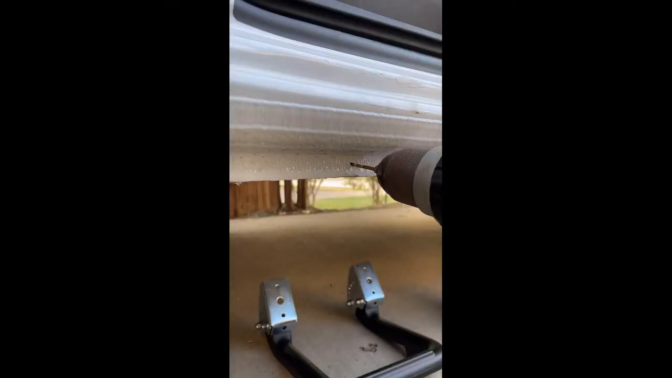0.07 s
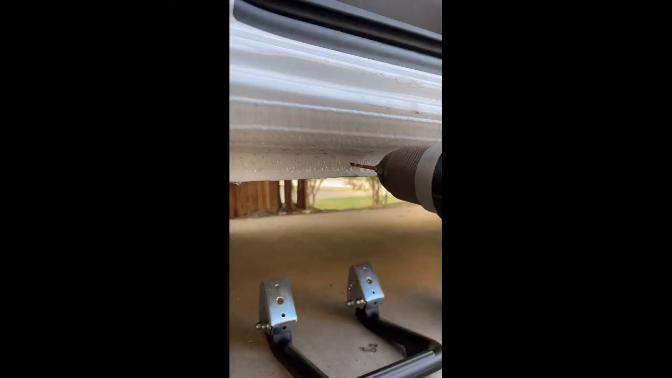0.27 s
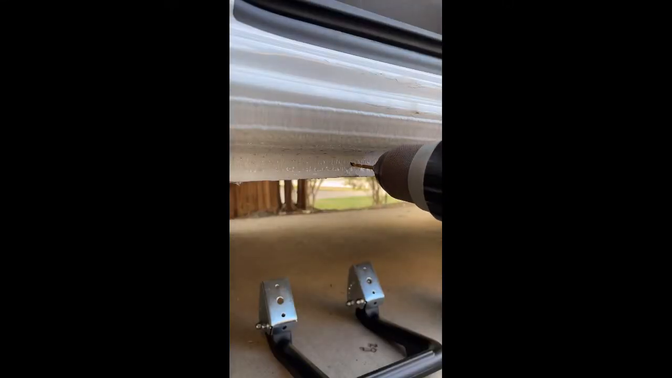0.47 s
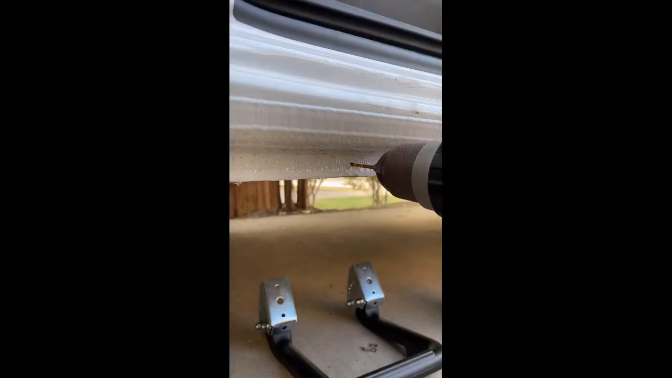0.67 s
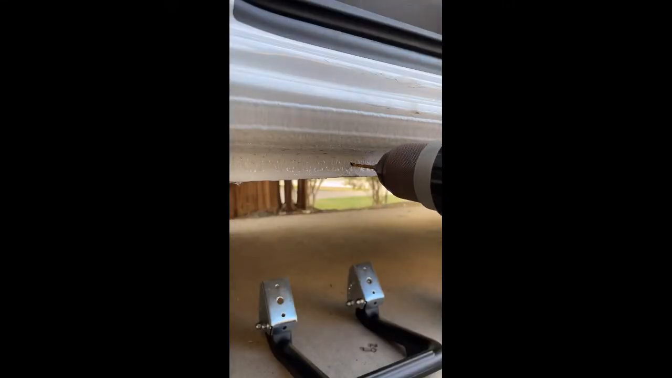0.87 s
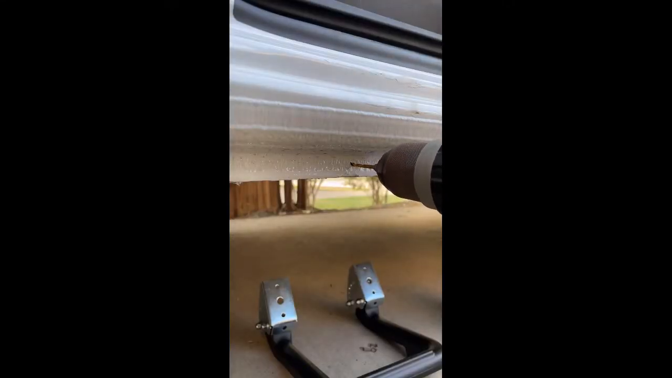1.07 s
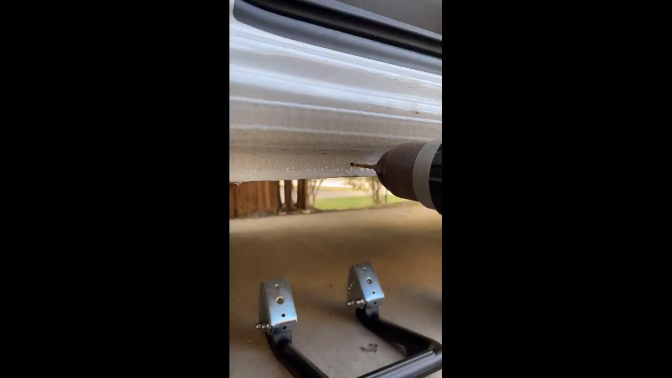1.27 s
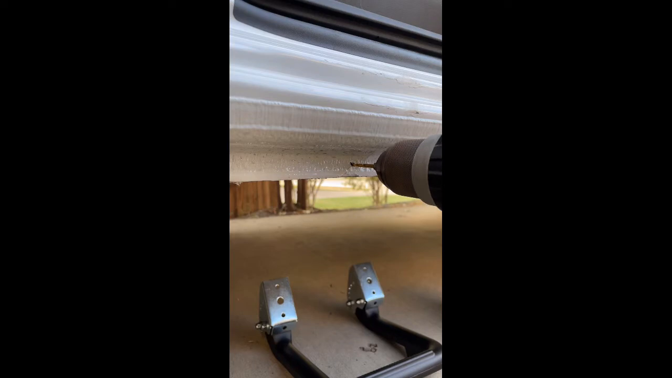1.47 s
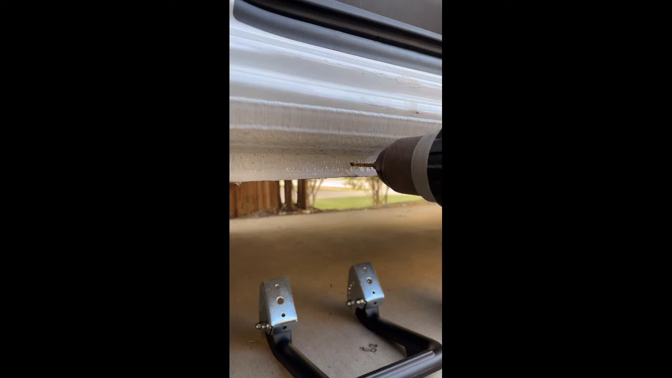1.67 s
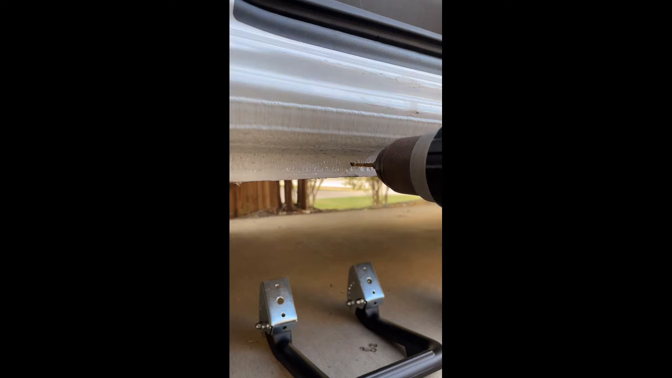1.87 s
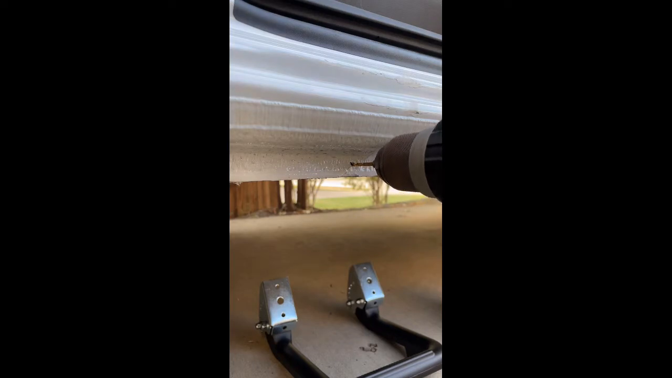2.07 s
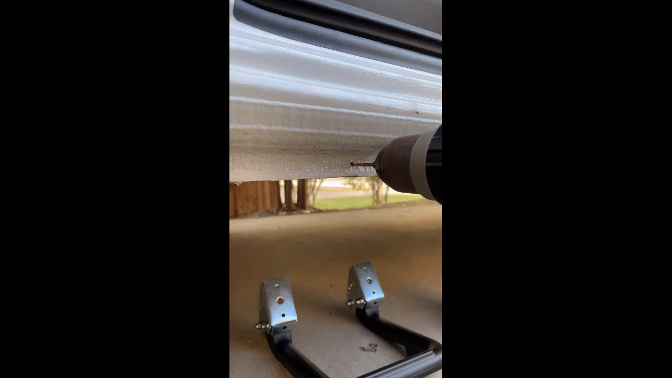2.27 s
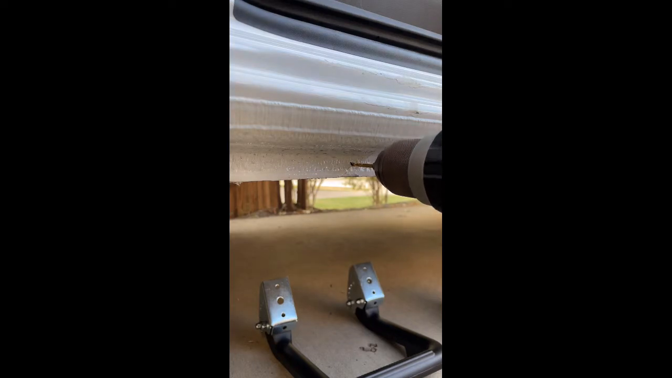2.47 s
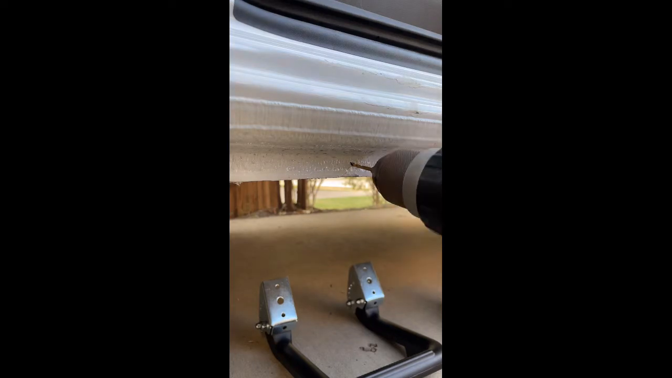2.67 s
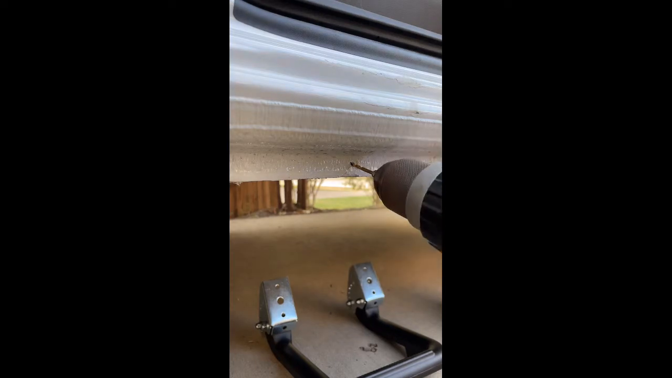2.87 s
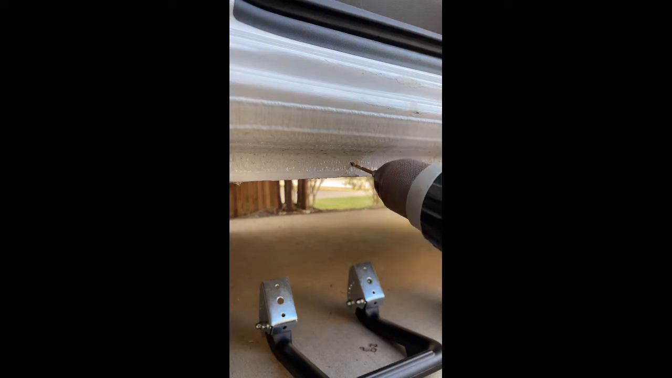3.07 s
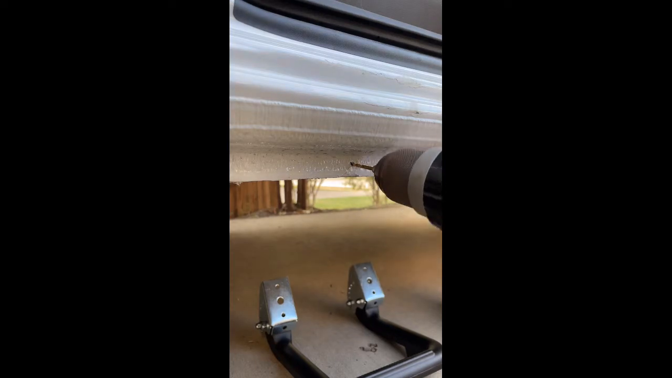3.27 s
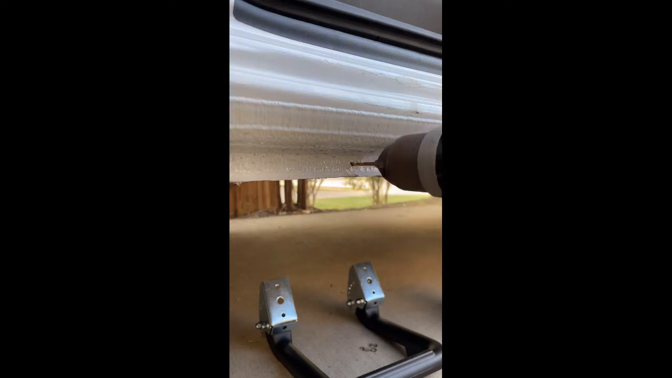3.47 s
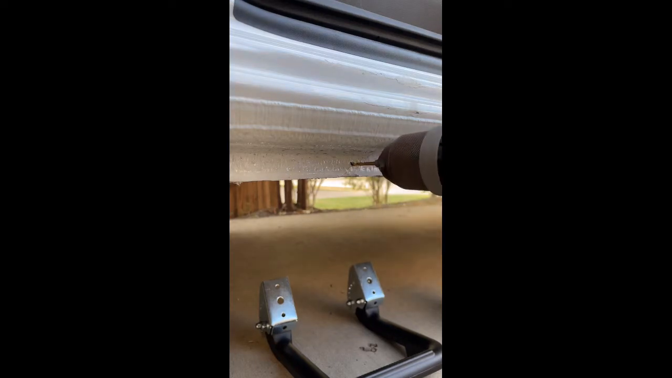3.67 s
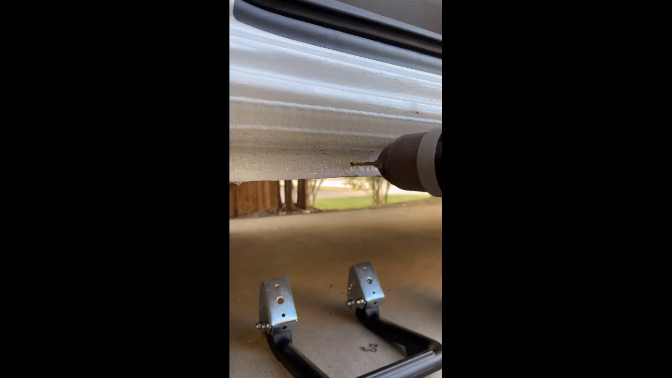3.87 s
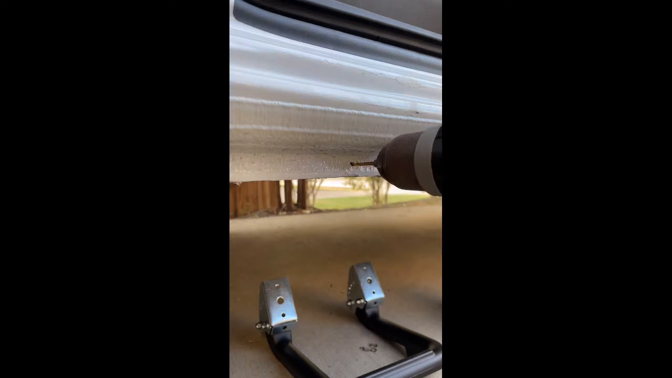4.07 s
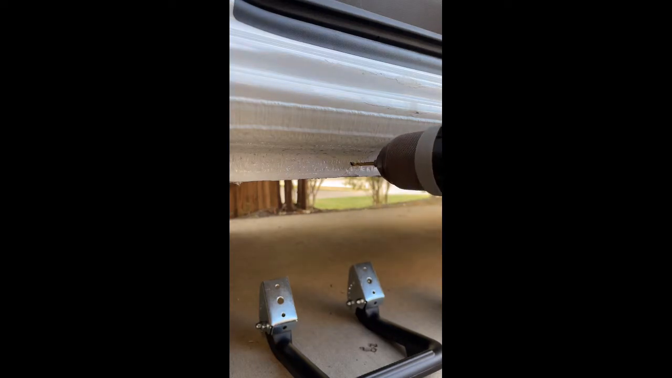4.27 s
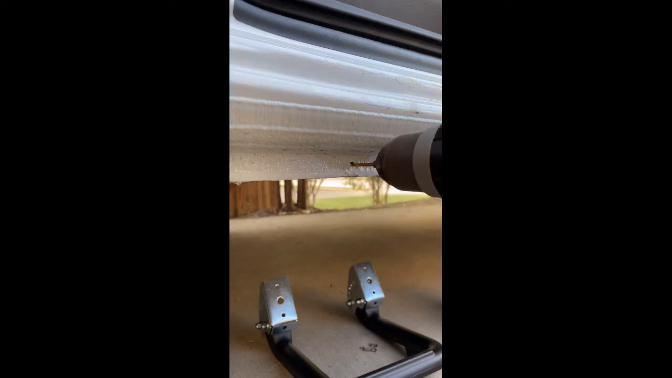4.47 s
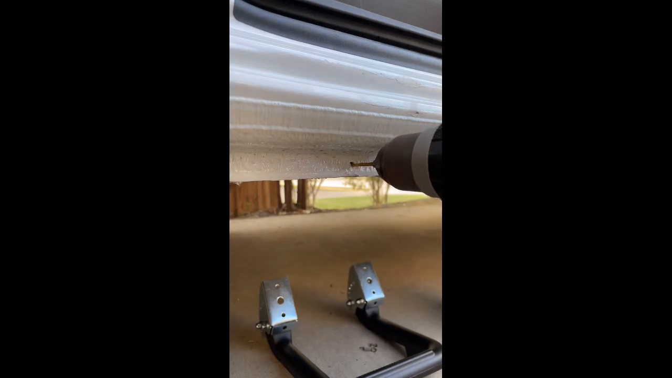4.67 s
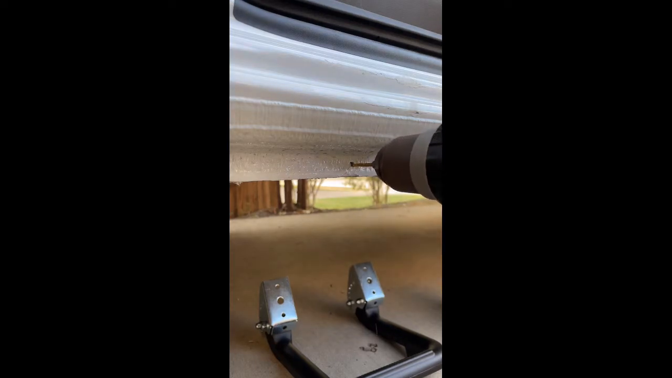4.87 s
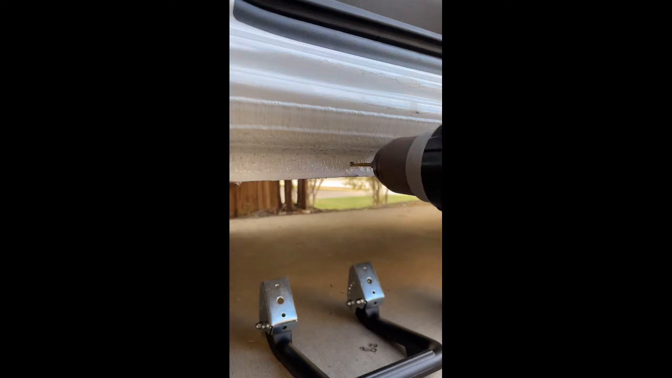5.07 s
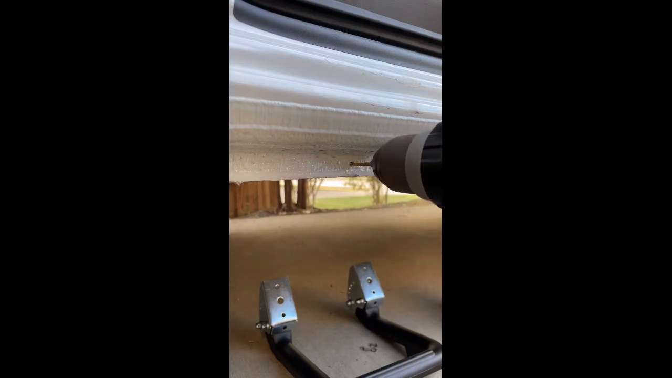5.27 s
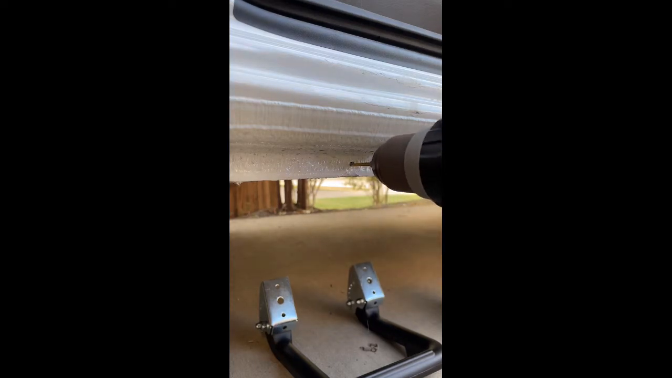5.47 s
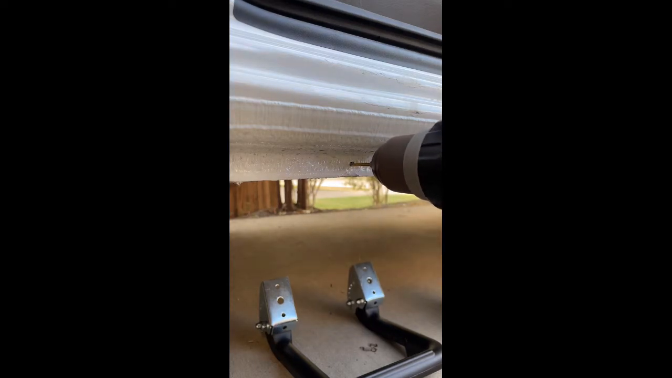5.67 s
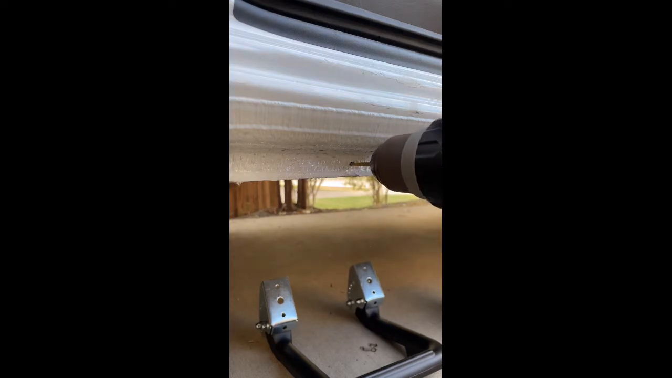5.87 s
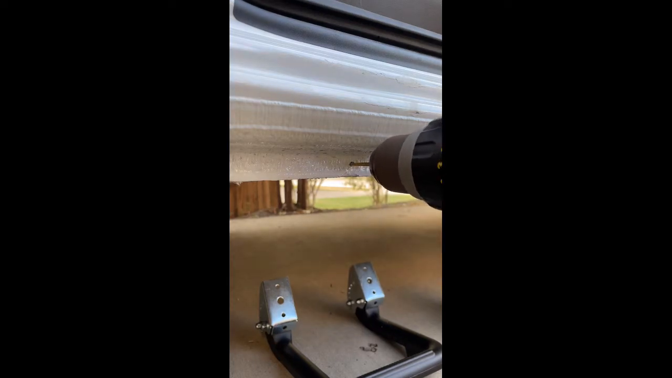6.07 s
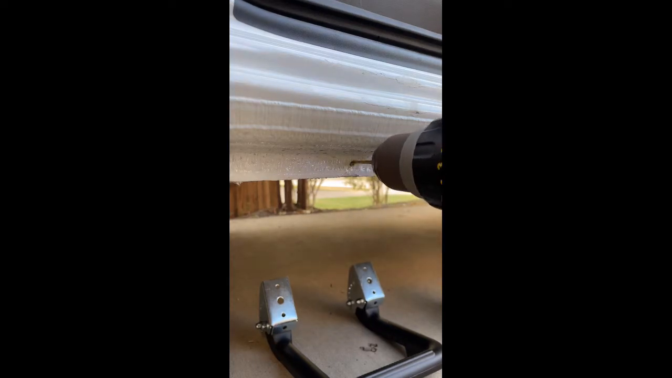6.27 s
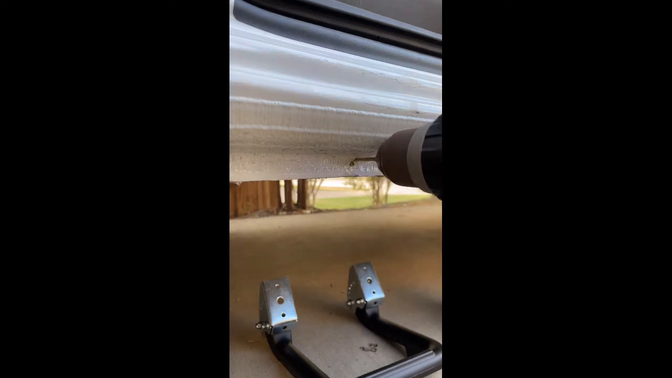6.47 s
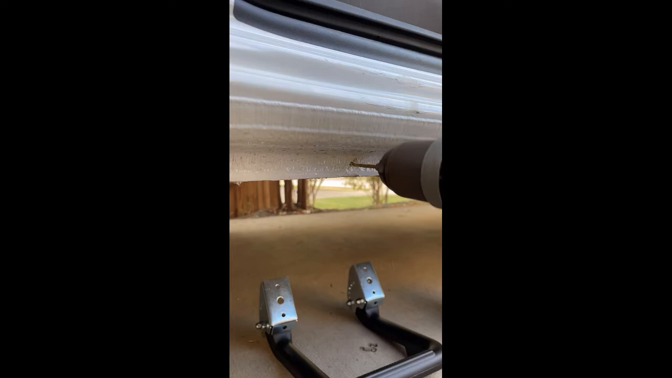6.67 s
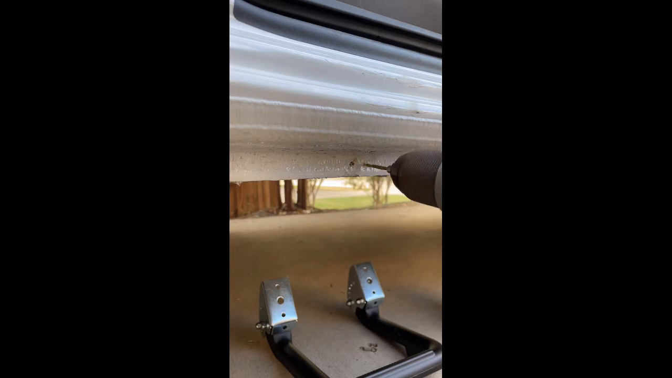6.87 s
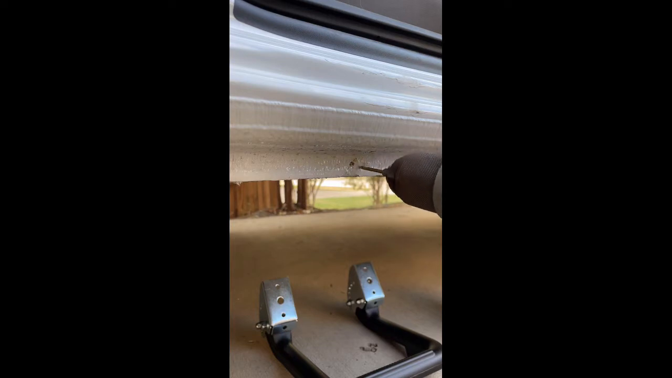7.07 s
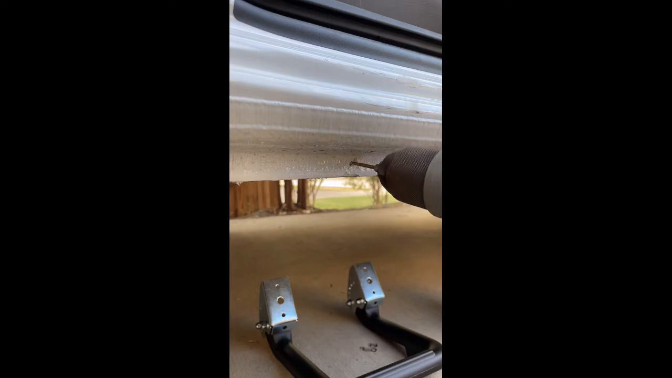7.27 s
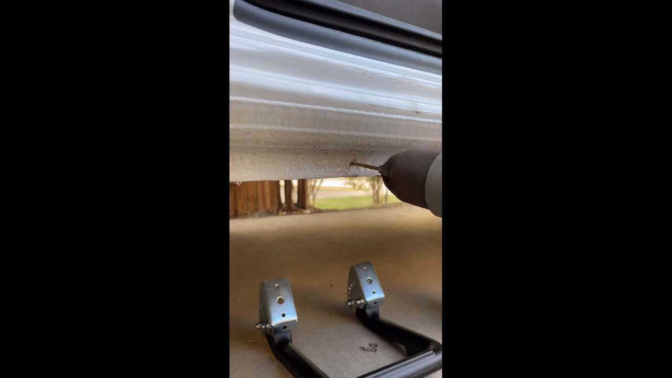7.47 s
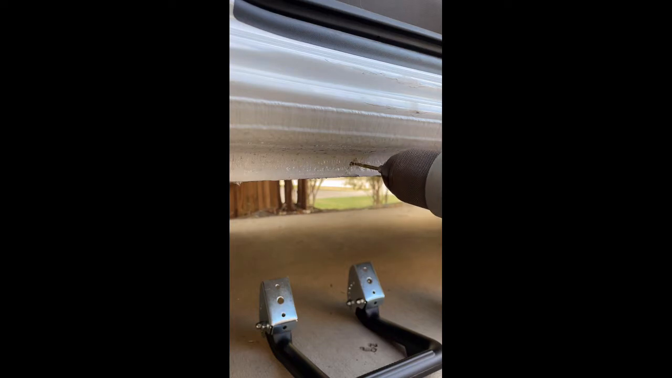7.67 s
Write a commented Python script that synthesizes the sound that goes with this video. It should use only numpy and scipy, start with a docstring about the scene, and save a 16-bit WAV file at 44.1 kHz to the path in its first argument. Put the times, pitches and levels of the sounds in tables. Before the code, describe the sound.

A cordless drill whines and grinds through sheet metal in one short run, with light taps and a low outdoor rumble.

```python
"""Drilling into a van

A cordless drill bores a small hole in a van's sheet metal, close by, over a low outdoor rumble.
After a few light taps and bumps, the speed controller whistles, the spindle lock clacks free and
the motor winds up into a whine over grinding gears and the scraping bit. The brake stops it with
a second clack, and the bit rattles faintly out of the hole, making the thin metal ring."""
import sys
import numpy as np
from scipy import signal
from scipy.fft import rfft, irfft
from scipy.io import wavfile
from scipy.ndimage import uniform_filter1d, map_coordinates

SR = 44100
rng = np.random.default_rng(int(sys.argv[2]) if len(sys.argv) > 2 else 0)


def log_audio(samples):
    """Write samples as a 16-bit WAV file to the path given in sys.argv[1]."""
    # one column per channel
    frames = np.atleast_2d(samples).T
    # limit to full scale, then quantise
    limited = np.clip(frames, -1, 1)
    pcm = np.round(limited * 32767).astype(np.int16)
    wavfile.write(sys.argv[1], SR, pcm)


N = 340893
TIME = np.arange(N) / SR
FREQS = np.arange(N // 2 + 1) * SR / N
FULL_SPEED_HZ = 361.6  # motor turns a second
TRIGGER_S, BRAKE_S = 4.2585, 6.691

# Outdoor rumble, its swells and the air: (frequency [Hz], level [dB])
RUMBLE_SPECTRUM = [(15, -48), (25, -27.5), (38, -16.5), (58, 1.5), (80, -0.5), (115, -1.5), (160, -10),
                   (210, -17), (240, -10.5), (280, -17), (380, -24), (600, -42), (1200, -73)]
SWELL_SPECTRUM = [(40, -16), (105, 3.5), (160, -7.5), (235, -4.5), (300, -20), (550, -20), (900, -48),
                  (2500, -80)]
AIR_SPECTRUM = [(200, -3), (450, 2), (800, 0.5), (1350, 2), (1800, -4.5), (2300, -10.5), (3200, -12.5),
                (5000, -17.5), (10000, -22), (11500, -28), (13000, -30), (15000, -24)]
# When the rumble swells: (time [s], half length [s], level [dB])
SWELL_TIMES = [(1.78, 0.29, -46), (3.002, 0.43, -40.5)]
# A distant machine: (frequency [Hz], level [dB])
HUM_TONES = [(511.4, -63), (1222, -67.5), (1405, -69), (1674, -70), (2552, -80), (5281, -86.5), (9943, -91),
             (10078, -95), (10207, -83.5), (13851, -95.5), (14099, -98), (14346, -96.5)]
# The bit taps the panel: (time [s], level [dB], centre pitch [Hz])
BIT_TAPS = [(0.091, -47, 7500), (1.0298, -38.5, 2790), (2.667, -48, 9000), (3.0374, -52, 8000),
            (4.082, -45, 2960), (6.808, -41, 3200), (6.8695, -51, 7000), (6.899, -45, 3200),
            (6.9963, -43, 2930), (7.005, -47, 3200), (7.058, -50, 2800)]
# A tap, and the brush of a hand: (frequency [Hz], level [dB])
TAP_SPECTRUM = [(300, -21), (1400, -2.5), (2600, -6), (4500, -10), (7000, -4.5), (10000, -9), (12500, -12),
                (15500, -9)]
BRUSH_SPECTRUM = [(500, -8), (2500, 5), (10000, 6), (12500, -7), (15000, 5)]
# Bumps on the microphone: (time [s], peak level [dB])
SOFT_BUMPS = [(0.234, -25.5), (0.309, -33), (1.135, -31), (1.35, -33.5), (1.547, -31.5), (2.501, -36)]
# The speed the motor aims for: (time [s], share of full speed [0-1])
TARGET_SPEED = [(4.2585, 0.05), (4.3, 0.16), (4.34, 0.375), (4.41, 0.442), (4.46, 0.673), (4.58, 0.857),
                (4.655, 0.784), (4.665, 1.0), (6.555, 1.0), (6.59, 0.922), (6.69, 0.858)]
# The hand leans on the drill: (time [s], speed lost [turns/s], half length [s])
HAND_LEANS = [(4.88, 4.0, 0.13), (5.34, 1.9, 0.14), (6.39, 3.3, 0.11)]
# Tones of the spinning parts: (multiple of motor speed [x], level [dB])
RIPPLE_TONES = [(6, 0), (12, 0), (7, -10), (18, -8), (24, -3), (30, -10), (36, -10)]
FAN_TONES = [(14, 0), (28, -21)]
GEAR_TONES = [(17, 0), (18, -18), (19, -13), (20, -16), (22, -10), (33, -19), (34, -14), (35, -19)]
ROTOR_TONES = [(.258, -50), (.883, -49), (1, -44.5), (3, -43), (7, -34.5), (13.5, -41)]
# How well the motor case and the drill housing pass sound: (frequency [Hz], gain [dB])
CASE_GAIN = [(300, -35), (650, -11), (850, -6), (1030, 2), (1250, -3), (1700, -5), (2080, 4), (2300, -6),
             (3000, -4), (3800, -14), (5100, -16), (5550, 1), (6500, -1), (9000, -12)]
HOUSING_GAIN = [(3500, -27), (3890, 14.5), (4100, -14.5), (4430, 10), (4620, -3), (4850, 1.5), (5000, 1.5),
                (5080, 1), (5400, -1.5), (5750, -3.5), (5920, 3), (6040, 2.5), (6100, -4.5), (6145, -11)]
# Gears and bit at work: (frequency [Hz], level [dB])
GRIND_SPECTRUM = [(88, -55.5), (150, -19), (274, -20), (360, -17), (521, -21.5), (1050, -14.5), (1300, -15),
                  (2570, -9.5), (4430, -8.5), (4880, -10), (5380, -8.5), (6540, -10.5), (10000, -11.5),
                  (11700, -16.5), (15700, -14)]
# Where drill and panel boost or dull that sound: (frequency [Hz], width [Hz], gain [dB])
BODY_RESONANCES = [(390, 90, 1.5), (1070, 190, 4), (1430, 90, 3), (2100, 160, 5), (2260, 110, -5),
                   (2720, 260, 3), (3580, 240, 1.5), (4180, 150, 3), (4700, 200, 2), (5900, 300, 3),
                   (6550, 500, -4), (7200, 400, 3), (9200, 300, -4), (9900, 700, 4), (12900, 1200, -3),
                   (14900, 1000, 5)]
# How loud gears and bit are: (time [s], grinding level [dB], scraping level [dB])
CUTTING_LEVELS = [(4.33, -34, -42), (4.35, -29.5, -43), (4.39, -27, -34), (4.55, -23.5, -24),
                  (4.85, -22, -22.5), (5.57, -27, -27.5), (6.35, -26, -27.5), (6.56, -27, -29.5),
                  (6.68, -27.5, -29)]
# Spindle lock and gears knock: (time [s], level [dB], decay [s])
LOCK_KNOCKS = [(4.2981, -5, 0.002), (4.3007, -8, 0.0028), (4.3066, -14.5, 0.0046), (6.6897, -24, 0.021),
               (6.6965, -7.5, 0.0041), (6.7005, -8, 0.0045), (6.7044, -11, 0.0019)]
# One such knock: (frequency [Hz], level [dB])
KNOCK_SPECTRUM = [(88, -46.5), (150, -16.5), (473, -15), (1070, -8), (2420, -3.5), (3000, -10.5),
                  (3510, -2.5), (5930, -8.5), (6410, -12), (8930, -12.5), (11700, -19.5), (15700, -12.5)]
# How loud the fan is: (time [s], level [dB])
FAN_LOUDNESS = [(4.9, -25), (5.084, -20.5), (5.476, -24), (5.514, -29), (5.648, -26.5), (6.014, -28),
                (6.402, -23), (6.56, -27)]
# The thin metal rings: (frequency [Hz], width [Hz], level [dB])
METAL_RESONANCES = [(2286, 320, -7.5), (3450, 310, -28.5), (4130, 140, -2.5), (5230, 130, -22),
                    (9150, 600, -10), (10430, 780, -12), (11780, 130, -19), (15380, 700, -15)]


def amp(db):
    """Turns decibels into a gain."""
    return 10 ** (np.asarray(db) / 20)


def unit_rms(x):
    """Scales a sound to an average (rms) size of 1."""
    return x / np.sqrt(np.mean(x ** 2) + 1e-20)


def db_at(spectrum, hz=FREQS):
    """Looks up a spectrum's level on a log-frequency axis."""
    points_hz, db = np.transpose(spectrum)
    return np.interp(np.log(hz + 1), np.log(points_hz + 1), db)


def gain_curve(rows, column=1):
    """Gain over time from a table's dB column, held beyond its ends."""
    rows = np.array(rows)
    return amp(np.interp(TIME, rows[:, 0], rows[:, column]))


def colour(x, db):
    """Filters a sound to the spectrum db, ringing only after each hit (minimum phase)."""
    cepstrum = irfft(np.log(amp(np.maximum(db, -100))), N)
    cepstrum[1:N // 2] *= 2
    cepstrum[N // 2:] = 0
    response = irfft(np.exp(rfft(cepstrum)), N)[:4096]
    return signal.oaconvolve(x, response)[:N]


def resonance(hz, width):
    """A peak of height 1 in the spectrum."""
    return 1 / (1 + (2 * (FREQS - hz) / width) ** 2)


def noise(spectrum):
    """Noise of rms 1 with this spectrum."""
    white = rng.standard_normal(len(FREQS)) + 1j * rng.standard_normal(len(FREQS))
    return unit_rms(irfft(amp(db_at(spectrum)) * white, N))


def wander(hz):
    """A random wobble of rms 1, up to about this rate."""
    return unit_rms(signal.sosfilt(signal.butter(2, hz, fs=SR, output="sos"), rng.standard_normal(N)))


def band_rms(x, low_hz, high_hz):
    """How strong one band of a sound is."""
    band = rfft(x)[(FREQS > low_hz) & (FREQS < high_hz)]
    return np.sqrt(2 * np.sum(abs(band) ** 2)) / N


def add(mix, s, sound):
    """Mixes a sound in at time s."""
    part = mix[round(s * SR):][:len(sound)]
    part += sound[:len(part)]


def since(s):
    """Seconds since time s; zero before it."""
    return np.maximum(TIME - s, 0)


def hump(s, half_length):
    """A smooth rise and fall around time s."""
    return np.exp(-((TIME - s) / half_length) ** 2)


def burst(decay_s):
    """A short, dying puff of noise."""
    return rng.standard_normal(4096) * np.exp(-TIME[:4096] / decay_s)


def tones(turns, rows, flutter, flutter_hz):
    """Tones at multiples of the motor speed, each fluttering on its own."""
    return np.sqrt(2) * sum(amp(db) * np.sin(2 * np.pi * (multiple * turns + rng.random()))
                            * (1 + flutter * wander(flutter_hz)) for multiple, db in rows)


def outdoors(rumble_db=-41, air_db=-55, rumble_drop_db=-10, air_drop_db=-8):
    """Rumble, soft air and a distant machine's hum, all sinking while the drill runs."""
    progress = np.clip(since(TRIGGER_S) / (BRAKE_S - TRIGGER_S), 0, 1) ** .65
    rumble = noise(RUMBLE_SPECTRUM) * amp(rumble_db + rumble_drop_db * progress + .3 * wander(15))
    swells = noise(SWELL_SPECTRUM) * sum(amp(db) * hump(s, half) for s, half, db in SWELL_TIMES)
    hum = sum(amp(db) * np.sin(2 * np.pi * hz * TIME + .6 * wander(4)) for hz, db in HUM_TONES)
    air = amp(air_db) * noise(AIR_SPECTRUM)
    return rumble + swells + amp(air_drop_db * progress) * (air + np.sqrt(2) * hum)


def bit_taps(gain_db=-8, width_octaves=.8):
    """The bit touches the panel lightly; each tap is strongest around its own pitch."""
    taps = np.zeros(N)
    for s, db, centre_hz in BIT_TAPS:
        spectrum = rfft(burst(decay_s=.0043))
        hz = np.linspace(1, SR / 2, len(spectrum))
        focus = 1 / (1 + (np.log2(hz / centre_hz) / width_octaves) ** 4)
        tap = irfft(spectrum * amp(db_at(TAP_SPECTRUM, hz)) * focus)
        add(taps, s, amp(db + gain_db) * tap[:2000] / np.std(tap[:100]))
    return taps


def handling(bump_hz=47, brush_s=.29, brush_db=-55, fade_s=.08):
    """Low bumps, and a soft brush as the grip shifts."""
    brush = amp(brush_db) * np.exp(-abs(TIME - brush_s) / fade_s) * noise(BRUSH_SPECTRUM)
    bumps = sum(amp(db) * hump(s, .02) * np.cos(2 * np.pi * bump_hz * (TIME - s))
                for s, db in SOFT_BUMPS)
    return brush + bumps


def motor(inertia_s=.0834, brake_decay_s=.034):
    """Speed lags behind its target (the drive), sags under the hand and dies under the brake."""
    drive = np.interp(TIME, *np.transpose(TARGET_SPEED), left=0)
    lag = np.exp(-1 / (inertia_s * SR))
    share = signal.lfilter([1 - lag], [1, -lag], drive)
    sag = sum(depth * hump(s, half) for s, depth, half in HAND_LEANS)
    speed = (FULL_SPEED_HZ * share - sag) * np.exp(-since(BRAKE_S) / brake_decay_s)
    torque = np.maximum(drive - share, 0) * (TIME < BRAKE_S)  # twisting force while catching up
    return drive, np.maximum(speed, 0), torque, sag


def controller_whistle(drive, speed, chop_hz=3919.5, chop_db=-24.5, rise_db=8.5, octave_db=-37):
    """Current chopped into pulses whistles until it is first fully on."""
    pulse_width = np.maximum.accumulate(drive)
    phase = 2 * np.pi * chop_hz * TIME
    strength = amp(chop_db + rise_db * speed / FULL_SPEED_HZ) * np.sqrt(abs(np.sin(np.pi * pulse_width)))
    attack = np.minimum(since(TRIGGER_S) / .004, 1)
    whistle = attack * strength * np.sin(phase) * (1 + .13 * wander(121.5))
    octave = amp(octave_db) * np.sin(2 * np.pi * pulse_width) * np.sin(2 * phase)
    return np.sqrt(2) * (whistle + octave)


def gear_slack(speed):
    """While the speed changes, loose gears jiggle the shaft angle (in turns)."""
    change = uniform_filter1d(abs(np.gradient(speed)) * SR, 1500)
    return .0055 * np.tanh(change / 220) * wander(110)


def motor_ripple(turns, speed, torque, pull_db=-18, overtones_db=1, brake_db=-24):
    """The motor pulls in six steps a turn, making its case sing; braking gives one smoother tone."""
    shaft = turns + gear_slack(speed)
    share = speed / FULL_SPEED_HZ
    rows = [(multiple, db + db_at(CASE_GAIN, multiple * speed)) for multiple, db in RIPPLE_TONES]
    pull = amp(pull_db) * np.tanh(torque / .17) ** 1.5 * share ** .8  # tanh is the current limit
    stall_fade = np.clip((share - .27) / .12, 0, 1)
    brake = amp(brake_db) * np.minimum(since(BRAKE_S) / .0015, 1) * stall_fade
    main_tone = tones(shaft, rows[:1], flutter=.15, flutter_hz=70)
    overtones = tones(shaft, rows[1:], flutter=.35, flutter_hz=70)
    return (pull + brake) * main_tone + pull * amp(overtones_db) * overtones


def grinding(turns, grind_db=-1.6, scrape_db=-.77, chips_per_s=2500, split_hz=6500):
    """Gear teeth knock and chips of metal break off, shaking the drill and the panel."""
    carrier = turns * 7 / 27  # the knocks repeat with each turn of the gear carrier
    spindle = carrier / 3
    teeth = rng.standard_normal(400)
    knocks = unit_rms(map_coordinates(teeth, [(carrier % 1) * len(teeth)], mode="grid-wrap"))
    chips = unit_rms(rng.standard_normal(N) * (rng.random(N) < chips_per_s / SR))
    force = .09 * knocks + .46 * chips + rng.standard_normal(N)
    force *= 1 + .055 * np.sin(2 * np.pi * spindle) + .048 * wander(55)  # a harder bite once a turn
    body_db = sum(db * resonance(hz, width) for hz, width, db in BODY_RESONANCES)
    sound = colour(force, db_at(GRIND_SPECTRUM) + body_db)
    treble = irfft(rfft(sound) / (1 + (split_hz / (FREQS + 1)) ** 8), N)
    grind = amp(grind_db) * gain_curve(CUTTING_LEVELS) * (sound - treble) / band_rms(sound, 2300, 3700)
    scrape = amp(scrape_db) * gain_curve(CUTTING_LEVELS, 2) * treble / band_rms(sound, 8200, 15500)
    fade_in = np.minimum(since(TRIGGER_S) / .09, 1)  # the grinding fades in as the motor starts
    coast = amp(-682 * since(BRAKE_S + .013))  # the gears run on briefly after the brake
    return fade_in * coast * (grind + scrape)


def lock_clacks():
    """The spindle lock knocks as the motor starts and brakes."""
    knocks = np.zeros(N)
    for s, db, decay_s in LOCK_KNOCKS:
        add(knocks, s, amp(db) * burst(decay_s))
    shape_db = db_at(KNOCK_SPECTRUM)
    return colour(knocks, shape_db) / np.sqrt(np.mean(amp(shape_db) ** 2))


def rotor_growl(turns, speed, torque, sag, idle_db=-56, torque_db=-19, lean_db=-54):
    """A rough, low shaking follows the rotor and grows with torque and the lean of the hand."""
    strain = amp(idle_db) + amp(torque_db) * torque + amp(lean_db) * sag
    angle = 2 * np.pi * turns
    shake = wander(20) * np.sin(angle) + wander(20) * np.cos(angle)
    return strain * (speed / FULL_SPEED_HZ) ** 4 * shake


def whine(turns, speed, drive, gears_db=-26):
    """Fan blades and gear teeth sing through the housing and the rotor hums, growing with the drive."""
    fan_gain = amp(db_at(HOUSING_GAIN, FAN_TONES[0][0] * speed)) * gain_curve(FAN_LOUDNESS)
    fan = fan_gain * tones(turns + gear_slack(speed), FAN_TONES, flutter=.084, flutter_hz=12)
    gear_gain = amp(gears_db + db_at(HOUSING_GAIN, GEAR_TONES[0][0] * speed))
    gears = gear_gain * tones(turns, GEAR_TONES, flutter=.12, flutter_hz=20)
    rotor = (speed / FULL_SPEED_HZ) ** 6 * tones(turns, ROTOR_TONES, flutter=.2, flutter_hz=10)
    spinning = np.minimum(speed / (.95 * FULL_SPEED_HZ), 1) ** 6
    return spinning * drive ** 3.7 * (fan + gears + rotor)


def metal_ring(start_s=6.72, end_s=7.16, slide_db=-56.5, slips_per_s=220, knock_db=-18):
    """The bit slides out in tiny slips that ring the thin metal; each tap on the way rings it more."""
    shape = sum(amp(db) / np.sqrt(width) * resonance(hz, width) for hz, width, db in METAL_RESONANCES)
    slips = rng.uniform(.34, 1, N) * (rng.random(N) < slips_per_s / SR)
    rubbing = .046 * rng.standard_normal(N)
    ring = unit_rms(colour(slips + rubbing, 20 * np.log10(shape)))
    slide = (TIME > start_s) * amp(slide_db - 16 * since(start_s) - 110 * since(end_s))
    knocks = sum((TIME > s) * amp(db + knock_db) * np.exp(-since(s) / .04)
                 for s, db, _ in BIT_TAPS if s > start_s)
    return np.hypot(slide, knocks) * ring * amp(1.8 * wander(30))


def with_echoes(x, near_db=-10, near_fade_s=.12, far_db=-29, far_fade_s=.57):
    """Adds quick echoes from the van and the ground, then a faint, dull tail."""
    t = TIME[:SR]
    near, far = rng.standard_normal((2, SR)) * (t > .003)
    near *= amp(-60 * t / near_fade_s)
    far = signal.sosfilt(signal.butter(1, 4000, fs=SR, output="sos"), far) * amp(-60 * t / far_fade_s)
    echo = amp(near_db) * near / np.linalg.norm(near) + amp(far_db) * far / np.linalg.norm(far)
    return x + signal.fftconvolve(x, echo)[:N]


def scene():
    """One motor sets the pace of all the spinning parts; left and right sound the same."""
    drive, speed, torque, sag = motor()
    turns = np.cumsum(speed * (1 + .0003 * wander(30))) / SR
    drill = with_echoes(grinding(turns) + lock_clacks() + bit_taps())
    drill += motor_ripple(turns, speed, torque) + whine(turns, speed, drive)
    drill += rotor_growl(turns, speed, torque, sag) + controller_whistle(drive, speed)
    mono = drill + metal_ring() + outdoors() + handling()
    return np.array([mono, mono])


def record(dry):
    """Rounds off the tallest peaks, then cuts the highest treble."""
    ceiling, cutoff_hz = .85, 15800
    rounded = dry / (1 + (dry / ceiling) ** 8) ** (1 / 8)
    lowpass = signal.firwin(801, cutoff_hz, window=("kaiser", 9), fs=SR)
    return signal.oaconvolve(rounded, lowpass[None], "same")


dry = scene()
out = record(dry)
log_audio(out)
```